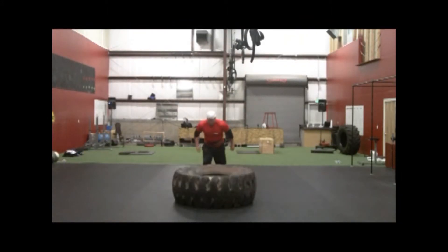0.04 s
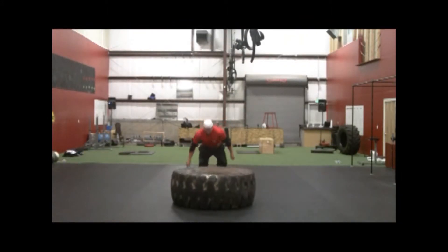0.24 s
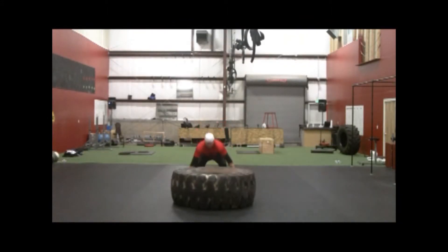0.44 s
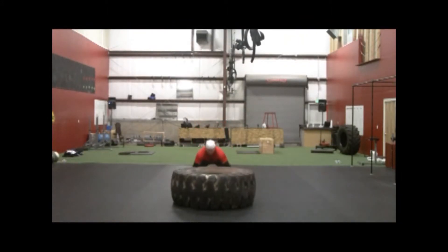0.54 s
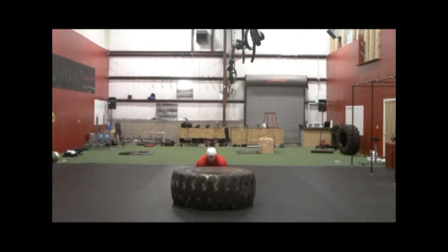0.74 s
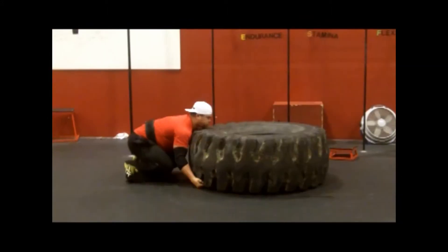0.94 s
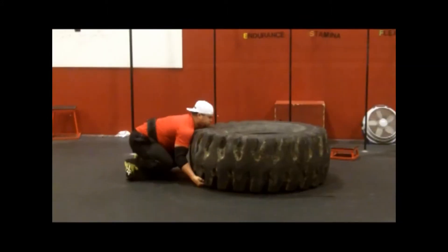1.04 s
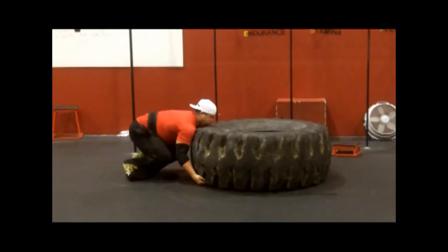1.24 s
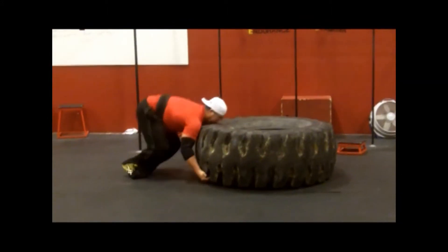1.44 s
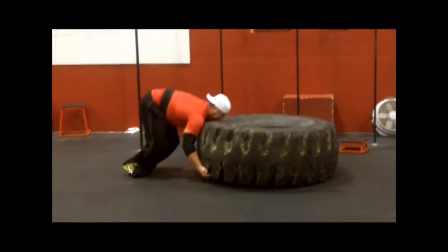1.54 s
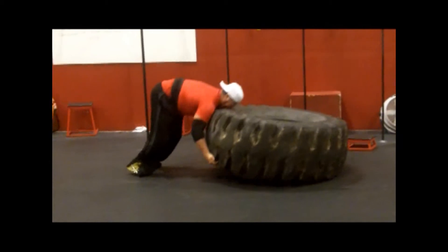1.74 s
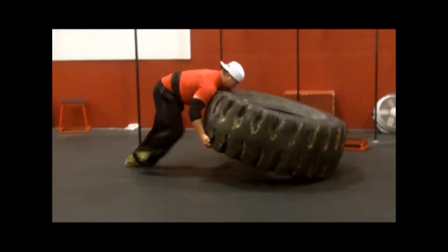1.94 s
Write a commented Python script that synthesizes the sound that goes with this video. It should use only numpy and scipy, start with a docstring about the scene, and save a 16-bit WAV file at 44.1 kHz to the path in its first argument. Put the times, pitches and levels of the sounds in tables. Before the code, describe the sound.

A big tire lands with a loud, deep boom that distorts the microphone. Faint metallic ringing and a long echo fade through a large gym, leaving electrical hum, ventilation and two faint taps as the tire is gripped.

```python
"""A rasping boom and a ringing hall: a heavy tractor tire falls flat on the floor of a large gym.
Its edge touches, the sidewall slaps, the carcass booms and bounces once. The blast overloads the
microphone, which chops the boom toward a square wave; the hall rings for over a second.
Mains hum and ventilation lie underneath; two faint ticks come as the tire is gripped again."""
import sys
import numpy as np
from scipy import signal
from scipy.io import wavfile
from scipy.ndimage import uniform_filter1d

SR = 44100
rng = np.random.default_rng(int(sys.argv[2]) if len(sys.argv) > 2 else 0)


def int16_out(signal):
    """Quantize to a 16-bit WAV file."""
    q = np.round(np.clip(np.atleast_2d(signal).T, -1, 1) * 32767)
    wavfile.write(sys.argv[1], SR, q.astype(np.int16))


N = 88200
TIME = np.arange(N) / SR
SLAP_S = 0.2195   # the sidewall hits flat


def from_db(db):
    """Decibels to gain."""
    return 10 ** (np.asarray(db) / 20)


def pan(left_minus_right_db):
    """Left and right gains for a level difference."""
    return from_db(np.array([[left_minus_right_db], [-left_minus_right_db]]) / 2)


def at_hz(points, hz):
    """Interpolate a table on a log-frequency axis."""
    points_hz, values = np.transpose(points)
    return np.interp(np.log(hz), np.log(points_hz), values)


def decay(start_s, t60_s):
    """Silence, then an exponential fall from 1."""
    return (TIME >= start_s) * np.exp(-np.log(1000) * np.maximum(TIME - start_s, 0) / t60_s)


def build_up(start_s, rise_s):
    """Silence, then an exponential approach to 1."""
    return 1 - np.exp(-np.maximum(TIME - start_s, 0) / rise_s)


def ring(modes, start_s):
    """Damped sines set off by one blow."""
    return sum(from_db(db) * decay(start_s, t60_s) * np.sin(2 * np.pi * hz * (TIME - start_s))
               for hz, db, t60_s in modes)


def noise(spectrum, envelope=lambda hz: 1):
    """Stereo noise of rms about 1 in third-octave bands, each then shaped by its envelope."""
    # Stereo likeness of the sound field. Each row: frequency in Hz, left-right correlation.
    likeness = [(60, 0.97), (150, 1), (380, 0.87), (950, 0.86), (2400, 0.59), (5000, 0.083), (15000, 0.17)]
    edges_hz = np.geomspace(20, 18000, 30)
    centres_hz = np.sqrt(edges_hz[1:] * edges_hz[:-1])
    gains = from_db(at_hz(spectrum, centres_hz))
    gains = gains / np.sqrt(np.sum(gains ** 2 * np.diff(edges_hz)) * 2 / SR)
    white = rng.standard_normal((2, 2, N))
    bands = 0
    for k, hz in enumerate(centres_hz):
        bandpass = signal.butter(3, edges_hz[k:k + 2], "band", fs=SR, output="sos")
        mid, side = signal.sosfilt(bandpass, white[k % 2])
        alike = at_hz(likeness, hz)
        stereo = np.sqrt((1 + alike) / 2) * mid + np.sqrt((1 - alike) / 2) * side * [[1], [-1]]
        bands = bands + gains[k] * envelope(hz) * stereo
    return bands


def mains_hum():
    """A steady low tone with harmonics, a little to the right."""
    # Hum partials. Each row: harmonic number, rms level in dB before panning.
    partials = [(1, -30.5), (2, -56), (3, -45), (5, -53), (7, -65)]
    hum_hz = 58.54
    hum = sum(np.sqrt(2) * from_db(db) * np.sin(2 * np.pi * (k * hum_hz * TIME + rng.random()))
              for k, db in partials)
    return pan(-3.5) * hum


def ventilation():
    """Air rumble and hiss, slightly quieter at first."""
    # Room noise. Each row: frequency in Hz, relative density in dB.
    spectrum = [(25, -6.5), (70, -0.5), (120, -7), (220, -11.5), (450, -20.5), (1000, -22.5), (2000, -29),
                (4000, -37.5), (6500, -39.5), (7800, -41), (9500, -43), (15000, -42.5)]
    level_db = np.interp(TIME, [0, 1.0], [-42, -41])
    return from_db(level_db) * noise(spectrum)


def touch():
    """The tread meets the floor first and folds with a dull swell."""
    # Tread contact. Each row: frequency in Hz, relative density in dB.
    spectrum = [(60, 11.5), (200, 5), (600, 5), (1100, -1), (2200, -14), (6000, -37)]
    peak_s, rise_s, fall_s = 0.2107, 0.0038, 0.097
    age_s = TIME - peak_s
    swell = np.exp(np.minimum(age_s / rise_s, -age_s / fall_s))
    return from_db(-12) * swell * noise(spectrum)


def thump(start_s, db, contact_s):
    """One landing: a deep tone that sags as the tire flattens and stops as it springs back."""
    start_hz, sag_octaves_per_s, release_s = 127.06, 10.5, 0.012
    age_s = np.maximum(TIME - start_s, 0)
    hz = start_hz * 2 ** (-sag_octaves_per_s * age_s)
    level = from_db(db) * np.exp(-np.maximum(age_s - contact_s, 0) / release_s)
    return level * np.sin(2 * np.pi * np.cumsum(hz * (age_s > 0)) / SR)


def boom():
    """Two heavy landings thump; the carcass ringing swells as floor and hall take it up."""
    # Landing and bounce. Each row: start in seconds, level in dB, contact time in seconds.
    landings = [(0.2137, 12, 0.126), (0.353, 4.5, 0.1164)]
    # Low modes of carcass and hall. Each row: frequency in Hz, level in dB, T60 in seconds.
    modes = [(60.1, 5, 1.61), (72.26, 1.5, 1.63), (97.5, 8, 1.26), (120, 4, 0.64), (135.63, 12.5, 1.1),
             (141.1, 15.5, 1.12), (157.3, 7.5, 1.4)]
    thumps = sum(thump(*landing) for landing in landings)
    ringing = build_up(SLAP_S, rise_s=0.15) * ring(modes, SLAP_S)
    push_s = 0.0033
    pole = np.exp(-2 / (push_s * SR))   # the soft contact acts as a low-pass
    return signal.lfilter([1 - pole], [1, -pole], -(thumps + ringing))


def fittings():
    """The impact shakes metal fittings into ringing."""
    # Metal modes. Each row: frequency in Hz, level in dB, T60 in seconds.
    modes = [(297, -22.5, 1.89), (348.5, -23.5, 2.32), (434.5, -17.5, 1.96), (460.8, -20.5, 2.5),
             (471, -34.5, 1), (563.7, -27.5, 2.2), (642, -40.5, 4.3), (765, -32, 2.2)]
    return ring(modes, SLAP_S)


def slap():
    """The sidewall cracks on the floor; further smacks and early echoes follow."""
    # Sidewall crack. Each row: frequency in Hz, relative density in dB.
    crack_spectrum = [(300, -42), (1200, -11), (2300, -6), (3700, 8), (6500, 3.5), (10000, -14.5),
                      (16000, -62)]
    # Rubber smacks and echoes. Each row: start in seconds, level in dB, T60 in seconds.
    echoes = [(0.249, -18, 0.026), (0.2656, 6.5, 0.078), (0.299, 3.5, 0.074), (.354, -5.5, 0.13),
              (0.395, -7.5, 0.13)]
    # Their spectrum. Each row: frequency in Hz, relative density in dB.
    echo_spectrum = [(200, -5), (900, 14.5), (2800, -11), (6000, -9.5), (10000, -22.5), (16000, -43)]
    crack = from_db(7) * decay(SLAP_S, t60_s=0.012) * noise(crack_spectrum)
    echo_level = sum(from_db(db) * decay(start_s, t60_s) for start_s, db, t60_s in echoes)
    return crack + echo_level * noise(echo_spectrum)


def hall():
    """Diffuse reverberation builds up and dies, the treble first."""
    # Gym reverberation. Each row: frequency in Hz, relative density in dB.
    spectrum = [(25, -12.5), (60, -4), (130, -4.5), (230, -3), (330, -10.5), (500, -25.5), (1000, -24.5),
                (1800, -23.5), (2900, -23), (4200, -31), (6300, -35.5), (8000, -47), (11000, -40.5),
                (16000, -64)]
    # Its decay. Each row: frequency in Hz, T60 in seconds.
    decay_times = [(40, 1.64), (130, 1.574), (240, 0.96), (450, 1.37), (1200, 1.265), (3000, 1.427),
                   (4500, 1.233), (6500, 0.93), (9000, 0.71), (15000, 0.33)]
    tail = noise(spectrum, lambda hz: decay(SLAP_S, at_hz(decay_times, hz)))
    return pan(1.4) * from_db(9.5) * build_up(SLAP_S, rise_s=0.023) * tail


def crunch():
    """A short, bright scrunch as the sidewall spreads over the floor."""
    # Scrunching rubber. Each row: frequency in Hz, relative density in dB.
    spectrum = [(800, 0), (3000, -10.5), (6500, -2.5), (11000, -12), (16000, -18.5)]
    peak_s, width_s = 0.297, 0.012
    return from_db(-7.5) * np.exp(-((TIME - peak_s) / width_s) ** 2) * noise(spectrum)


def grip_ticks():
    """Gripping the tread makes two small, dull taps with a little room after them."""
    # Taps. Each row: start in seconds, level in dB.
    ticks = [(1.8516, -31.5), (1.8647, -28.5)]
    # Modes of a tap. Each row: frequency in Hz, relative level in dB, T60 in seconds.
    modes = [(1090, -4, 0.0035), (1560, -3, 0.007)]
    # Tap reverberation. Each row: frequency in Hz, relative density in dB.
    room_spectrum = [(300, -7), (800, -1), (1400, 8), (2200, -19), (4000, -29), (10000, -50)]
    taps = sum(from_db(db) * ring(modes, start_s) for start_s, db in ticks)
    room_level = sum(from_db(db - 18) * decay(start_s, t60_s=0.12) for start_s, db in ticks)
    return taps + room_level * noise(room_spectrum)


def scene():
    """Everything that reaches the microphone."""
    impact = touch() + boom() + fittings() + slap() + crunch()
    return impact + hall() + grip_ticks() + mains_hum() + ventilation()


def overload(dry):
    """Hard clipping. A fizzing noise rides on the boom while it clips; some treble gets past."""
    # Fizz on the clipped peaks. Each row: frequency in Hz, relative density in dB.
    fizz_spectrum = [(300, -7), (1500, 3.5), (3000, -2.5), (6000, -6), (10000, -15.5), (16000, -46)]
    ceiling, hardness, fizz_window_s, leak_above_hz = 0.82, 12, 0.017, 7300
    clipped = dry / (1 + np.abs(dry / ceiling) ** hardness) ** (1 / hardness)
    overloaded_share = uniform_filter1d(1.0 * (np.abs(dry) > ceiling), int(fizz_window_s * SR) + 1)
    fizz = from_db(-19) * overloaded_share * np.abs(clipped) * noise(fizz_spectrum)
    highpass = signal.butter(2, leak_above_hz, "high", fs=SR, output="sos")
    leak = from_db(-9.5) * signal.sosfilt(highpass, dry - clipped)
    return clipped + fizz + leak


def record(dry):
    """Overload, then a narrow treble dip and a steep low-pass."""
    notch_hz, notch_width_hz, notch_share, cutoff_hz = 7700, 850, 0.62, 15800
    distorted = overload(dry)
    notched = signal.lfilter(*signal.iirnotch(notch_hz, notch_hz / notch_width_hz, fs=SR), distorted)
    coloured = distorted + notch_share * (notched - distorted)
    return signal.sosfilt(signal.ellip(10, 0.2, 70, cutoff_hz, fs=SR, output="sos"), coloured)


dry = scene()
out = record(dry)
int16_out(out)
```